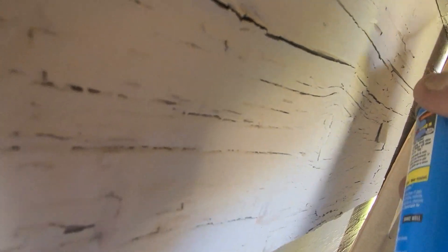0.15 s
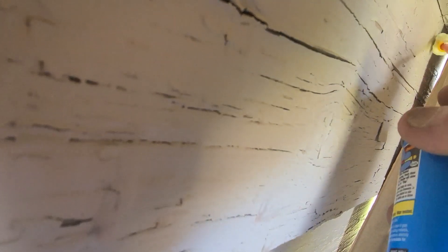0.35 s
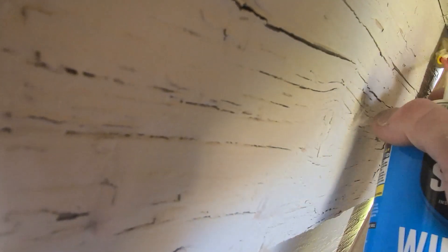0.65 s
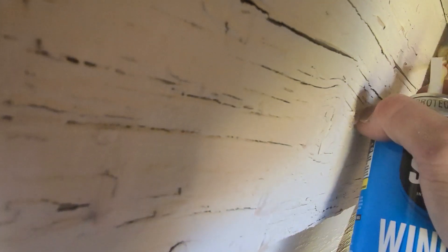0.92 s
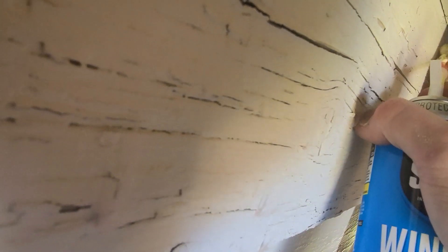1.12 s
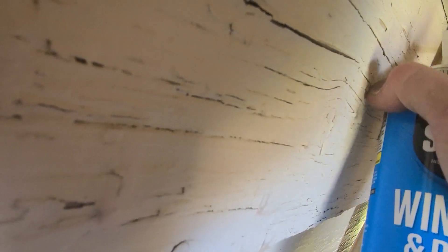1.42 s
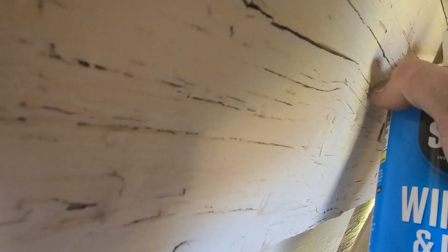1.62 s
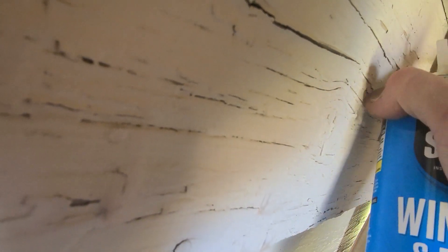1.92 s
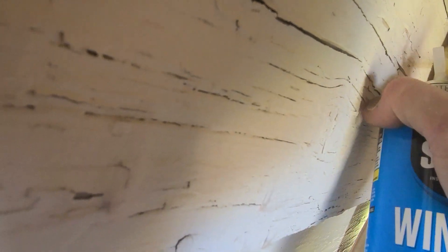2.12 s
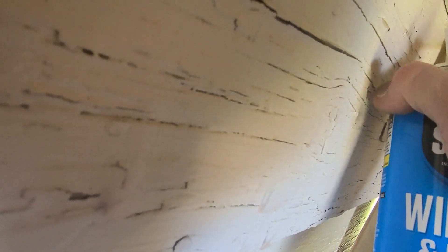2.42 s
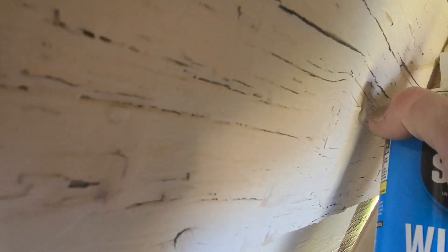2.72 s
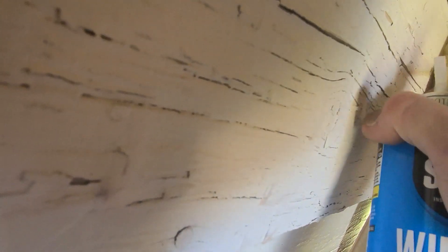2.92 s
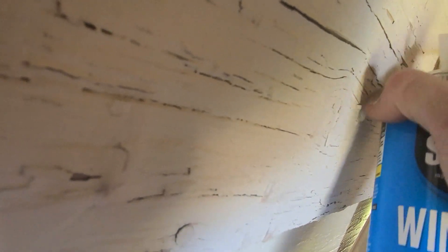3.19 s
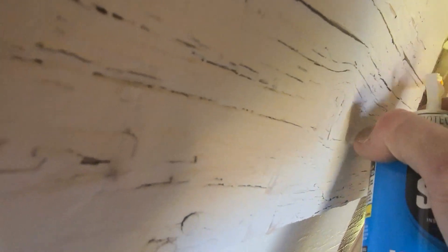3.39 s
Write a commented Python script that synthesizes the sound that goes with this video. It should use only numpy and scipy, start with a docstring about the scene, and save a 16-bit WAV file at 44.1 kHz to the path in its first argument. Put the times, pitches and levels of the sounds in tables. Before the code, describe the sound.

Aerosol foam sprays through a straw into a gap in boards: faint hand rubbing and small plastic clicks, then a bright spit becoming a rapid hollow sputter, close to a small stereo microphone, slightly right.

```python
"""Foam sealant is sprayed from an aerosol straw into a gap in a wooden wall, right of a small camera.
Throughout, filtered noise gives a low rumble; at first a hand shifts on the can, as noise of wavering level.
The trigger clicks three times, as decaying sines with a short rattle, scattered by the boards.
Gas and foam then spit in quick bursts: noise and bubble pops drive a bright hiss, the straw tip and the gap,
which rings like a bottle neck whose lowest pitch later sinks as foam fills it and buries the tip."""
import sys
import numpy as np
from scipy import signal
from scipy.fft import rfft, irfft
from scipy.io import wavfile
from scipy.ndimage import uniform_filter1d

SR = 44100
rng = np.random.default_rng(int(sys.argv[2]) if len(sys.argv) > 2 else 0)


def voltage_ratio(decibels):
    """Convert decibels (scalar or array-like) to amplitude ratios, 20 dB per decade."""
    exponent = np.asarray(decibels, float) / 20
    return 10 ** exponent


def transcribe(signal):
    """Save signal, clipped to [-1, 1], as a 16-bit WAV file at the path in sys.argv[1]."""
    frames = np.atleast_2d(signal).T
    limited = np.clip(frames, -1, 1)
    pcm = np.round(limited * 32767).astype(np.int16)
    wavfile.write(sys.argv[1], SR, pcm)


N = 156555  # samples

# Spectrum of the rumble. Each row: frequency in Hz, relative density in dB per Hz.
RUMBLE_SPECTRUM = [(12, -44), (35, 0.5), (47, -0.5), (57, 11), (78, -6.5), (118, -1.5), (140, -22),
                   (800, -46)]
# Strength of the hand and sleeve rubbing. Each row: time in seconds, mean level in dB.
RUB_LEVEL = [(0, -40), (0.128, -38.5), (.165, -30), (.29, -33), (.38, -39), (.5, -41.5), (.515, -44.5),
             (.64, -46)]
# Spectrum of the rubbing. Each row: frequency in Hz, relative density in dB per Hz.
RUB_SPECTRUM = [(300, -13.5), (750, -4), (1050, -6), (1450, 4), (2050, -0.5), (2600, -9), (3150, -8),
                (4600, -24.5), (6400, -13.5), (9000, -34), (12000, -23)]
# Trigger clicks. Each row: start in seconds, level before the high-pass in dB,
# treble tilt about 3 kHz in dB per octave.
TRIGGER_CLICKS = [(.3028, -11, 5), (.3113, 3, 1), (.3355, -2.5, -3)]
# Modes of the plastic trigger. Each row: frequency in Hz, level before the tilt in dB,
# time to decay by 60 dB in seconds.
TRIGGER_MODES = [(1250, -1, .008), (2000, -4, .006), (2750, -2, .007), (3650, 0, .006), (5000, -4, .005),
                 (6050, 2, .009), (6750, 0, .008)]
# Valve and gap. Each row: time in seconds, steady flow level in dB, hiss relative to the flow in dB,
# then third pitch, second pitch and straw tip, each relative to the lowest pitch in dB.
VALVE_FLOW = [(.622, -53, -10, -18, -23, -13), (.645, -29, 4, 1, -1, 14.5), (.715, -27, 9.5, -6, 11, 11),
              (.74, -32.5, 8, -12.5, 6, 3), (.98, -32.5, -8, -7, -4, 5.5), (1.3, -29.5, -15, -0.5, -3, -1),
              (1.42, -27.5, -9, -3.5, -1.5, 4), (1.7, -24, -19, -12, 3, -9.5),
              (2.21, -26.5, -18.5, -28, 1, -16), (2.35, -20, -22.5, -42, 12.5, -11),
              (2.73, -24, -24.5, -10, 14, -6.5), (2.757, -34, -19, -2.5, 12, -5), (2.8, -28, -7, -3, 4, -1),
              (2.93, -27, -9.5, 6.5, 10, -3), (3.07, -27, -13.5, -12.5, 9, -9.5),
              (3.17, -24, -25, -49, 15, -4.5), (3.3, -26, -13, -7, 11.5, -4),
              (3.55, -22, -11, 10.5, 21.5, 1.5)]
# Gas breaking into the open air with a bright crack. Each row: start in seconds, peak level in dB.
OPEN_AIR_CRACKS = [(0.69, -17), (.776, -26), (0.876, -22.5), (.748, -31), (1.17, -33), (1.389, -21.5),
                   (1.405, -28), (1.751, -34)]
# Bursts of gas through the foam. Each row: start in seconds, peak level in dB.
GAS_SPITS = [(0.772, -31), (0.806, -31), (0.83, -32.5), (0.872, -26.5), (0.921, -25.5), (0.953, -24.5),
             (0.996, -25.5), (1.021, -25), (1.047, -19.5), (1.083, -19.5), (1.135, -18.5), (1.165, -21),
             (1.231, -17.5), (1.286, -23), (1.316, -20), (1.342, -20.5), (1.392, -19.5), (1.454, -20),
             (1.479, -21.5), (1.512, -24.5), (1.533, -19.5), (1.588, -24.5), (1.61, -21), (1.667, -20.5),
             (1.7, -21), (1.72, -21), (1.749, -18), (1.805, -21), (1.828, -30), (1.865, -18), (1.905, -21),
             (1.939, -23.5), (1.961, -19.5), (1.991, -23.5), (2.023, -23), (2.042, -23.5), (2.086, -23),
             (2.121, -20.5), (2.164, -25), (2.223, -19), (2.268, -37), (2.284, -32), (2.322, -23),
             (2.358, -27), (2.399, -25), (2.44, -23), (2.488, -22.5), (2.519, -22), (2.564, -21.5),
             (2.609, -24), (2.636, -34), (2.653, -19), (2.699, -16), (2.737, -21), (2.767, -23.5),
             (2.938, -23), (3.004, -28), (3.106, -23), (3.163, -25), (3.19, -24.5), (3.251, -23.5),
             (3.291, -26.5), (3.398, -22), (3.469, -23), (3.508, -28)]
# Lowest pitch of the gap, about which it wanders. Each row: time in seconds, frequency in Hz.
GAP_PITCH = [(1.8, 763), (2.4, 615), (2.8, 528), (3.55, 404)]
# Second pitch of the gap, about which it wanders. Each row: time in seconds, frequency in Hz.
SECOND_PITCH = [(1.3, 1200), (2.3, 1371)]
# Straw tip resonances. Each row: frequency in Hz, width of each pole in Hz, relative gain in dB.
TIP_RESONANCES = [(3020, 700, 17.5), (4325, 2040, -8)]
# Spectrum of the open hiss. Each row: frequency in Hz, relative density in dB per Hz.
HISS_SPECTRUM = [(3000, -6), (5100, -3), (5900, 7), (7600, -6), (9800, -10), (12000, -2), (13500, -3),
                 (15500, 4)]
# Microphone pair, source on the right. Each row: frequency in Hz, left minus right level in dB,
# shared part of the power from 0 to 1, phase lag of the left in radians.
MICROPHONE_PAIR = [(0, 0, .98, 0), (260, -3, .88, .4), (430, -8, .75, .8), (600, 1, .87, .8),
                   (780, -2, .94, 1.75), (1130, 1, .97, 2.4), (1480, 1.5, .95, 3.1), (1980, 1, .86, 4.1),
                   (2250, -4, .45, 4), (2550, -2, .75, 3.1), (2900, 3.5, .82, 4.7), (3450, -7, .35, 4),
                   (4130, -4, .55, 5.3), (6300, 0, .72, 9.1), (8000, 6.5, .2, 12), (9500, 0, .25, 14),
                   (15000, 4, .3, 22)]


def evened(x):
    """Normalization: each signal is divided by its root mean square."""
    return x / np.sqrt(np.mean(x ** 2, -1, keepdims=True) + 1e-20)


def colour(x, points):
    """Linear filtering: the spectrum is weighted by (Hz, dB) points joined over log frequency."""
    point_hz, db = np.transpose(points)
    hz = np.fft.rfftfreq(N, 1 / SR)
    gain = voltage_ratio(np.interp(np.log(hz + 1), np.log(point_hz + 1), db))
    return irfft(rfft(x) * gain, N)


def drift(seconds):
    """Random fluctuation: noise averaged twice over the given time, with rms 1."""
    size = max(int(seconds * SR), 2)
    once = uniform_filter1d(rng.standard_normal(N), size)
    return evened(uniform_filter1d(once, size))


def rumble():
    """Partial coherence: low noise of wavering level, nearly the same in both microphones."""
    level_db, waver_db, apart = -40.5, 0.5, 0.13
    common, difference = rng.standard_normal((2, N))
    pair = np.array([common + apart * difference, common - apart * difference])
    return voltage_ratio(level_db + waver_db * drift(0.017)) * evened(colour(pair, RUMBLE_SPECTRUM))


def rub():
    """Dry friction: skin and cloth give coloured noise, one strand shared and one per microphone."""
    grain_db = 2.5  # rms of the level's wavering
    level_db = np.interp(np.arange(N) / SR, *np.transpose(RUB_LEVEL), right=-120)
    friction = evened(colour(rng.standard_normal((3, N)), RUB_SPECTRUM))
    return voltage_ratio(level_db + grain_db * drift(0.0047)) * friction


def trigger():
    """Modal excitation: each click rings the plastic trigger's damped modes and leaves a short rattle."""
    rattle_db, rattle_t60_s, low_cut_hz = -21, .14, 750
    out, t = np.zeros(N), np.arange(6000) / SR
    for start_s, level_db, tilt_db in TRIGGER_CLICKS:
        ring = np.zeros(len(t))
        for hz, mode_db, t60_s in TRIGGER_MODES:
            decay = voltage_ratio(mode_db + tilt_db * np.log2(hz / 3000) - 60 * t / t60_s)
            ring -= decay * np.sin(2 * np.pi * hz * t)
        chatter = rng.standard_normal(len(t)) * voltage_ratio(-60 * t / rattle_t60_s)
        rattle = np.convolve(chatter, ring[:400])[:len(t)]
        click = ring / abs(ring).max() + voltage_ratio(rattle_db) * rattle / abs(rattle).max()
        out[round(start_s * SR):][:len(t)] += voltage_ratio(level_db) * click
    return signal.lfilter(*signal.butter(2, low_cut_hz, "high", fs=SR), out)


def scattered(x):
    """Diffuse reflection: the boards add to the direct strand a brief noise tail per microphone."""
    wall_t60_s = .016
    t = np.arange(3000) / SR
    tail = rng.standard_normal((2, len(t))) * voltage_ratio(-60 * t / wall_t60_s)
    tail /= np.linalg.norm(tail, axis=1, keepdims=True)
    return np.vstack([x, signal.oaconvolve(x[None], tail, axes=1)[:, :N]])


def turbulence():
    """Jet noise: broadband noise and random bubble pops, one strand shared and one per microphone."""
    bubbles_per_s, bubble_db, bubble_share = 2500, 1.5, .4  # share of the power
    flutter_db = 1.2
    sizes = voltage_ratio(bubble_db * np.minimum(rng.exponential(1, N), 3))
    pops = sizes * (rng.random(N) < bubbles_per_s / SR)
    bubbles = evened(pops * rng.choice([-1, 1], (3, N)))
    noise = rng.standard_normal((3, N))
    strands = np.sqrt(1 - bubble_share) * noise + np.sqrt(bubble_share) * bubbles
    return strands * voltage_ratio(flutter_db * drift(0.0087))


def bursts(rows, fall_s):
    """Transient flow: the power of each puff rises quickly and falls to half in fall_s after its peak."""
    rise_s = .007  # from start to peak
    t, power = np.arange(N) / SR, np.zeros(N)
    for start_s, db in rows:
        near = slice(int((start_s - .05) * SR), int((start_s + .1) * SR))
        from_peak = t[near] - start_s - rise_s
        half_s = np.where(from_peak < 0, rise_s / 2, fall_s)
        power[near] += voltage_ratio(2 * db) * .5 ** ((from_peak / half_s) ** 2)
    return power


def resonate(x, hz, width_hz):
    """Resonance: a double pole, each of width_hz, follows the frequency hz."""
    turn = np.exp(2j * np.pi * np.cumsum(hz * np.ones(N)) / SR)
    r = np.exp(-np.pi * width_hz / SR)
    # shift the resonance to zero frequency, low-pass, and shift back
    lowered = signal.lfilter([(1 - r) ** 2], [1, -2 * r, r * r], x / turn + 1e-18)
    return (turn * lowered).real


def spray():
    """Driven resonance: bursts over a steady flow excite the gap's three pitches, the tip and the hiss."""
    spit_fall_s, crack_fall_s = .01, 0.0097
    steady_hiss_db = -3  # the steady flow hisses less than the bursts
    low_width_hz, second_width_hz, third_width_hz = 350, 440, 620
    third_ratio, pitch_wander = 1.587, .035  # wander: rms fraction of the frequency
    own_flutter_db = 2

    t = np.arange(N) / SR
    flow_s, *columns = np.transpose(VALVE_FLOW)
    flow_db, hiss_db, third_db, second_db, tip_db = (np.interp(t, flow_s, c) for c in columns)
    steady = voltage_ratio(2 * flow_db) * (t > flow_s[0])
    spits = bursts(GAS_SPITS, spit_fall_s)
    body_power = steady + spits
    hiss_power = (voltage_ratio(2 * steady_hiss_db) * steady + spits) * voltage_ratio(2 * hiss_db)
    hiss_power += bursts(OPEN_AIR_CRACKS, crack_fall_s)

    jet = turbulence()
    low_hz = np.interp(t, *np.transpose(GAP_PITCH)) * (1 + pitch_wander * drift(0.0087))
    second_hz = np.interp(t, *np.transpose(SECOND_PITCH))
    wandering_hz = second_hz * (1 + pitch_wander * drift(0.0093))
    low = evened(resonate(jet, low_hz, low_width_hz))
    second = voltage_ratio(second_db) * evened(resonate(jet, wandering_hz, second_width_hz))
    third = voltage_ratio(third_db) * evened(resonate(jet, third_ratio * second_hz, third_width_hz))
    tip = np.zeros((3, N))
    for k, (hz, width_hz, db) in enumerate(TIP_RESONANCES):
        tip += (-1) ** k * voltage_ratio(db) * resonate(jet, hz, width_hz)  # alternating polarity
    tip = voltage_ratio(tip_db) * evened(tip)

    low_flutter, second_flutter, upper_flutter, hiss_flutter = (
        voltage_ratio(own_flutter_db * drift(0.012)) for _ in range(4))
    body = low * low_flutter - second * second_flutter + (third - tip) * upper_flutter
    # the shares divide the flow's power among the resonances
    body /= np.sqrt(1 + voltage_ratio(2 * second_db) + voltage_ratio(2 * third_db) + voltage_ratio(2 * tip_db))
    hiss = hiss_flutter * evened(colour(jet, HISS_SPECTRUM))
    return np.sqrt(body_power) * body + np.sqrt(hiss_power) * hiss


def microphones(strands):
    """Interaural-like cues: the shared strand lags at the left, and each microphone adds its own strand."""
    point_hz, *columns = np.transpose(MICROPHONE_PAIR)
    hz = np.fft.rfftfreq(N, 1 / SR)
    tilt_db, same, lag = (np.interp(hz, point_hz, c) for c in columns)
    spectra = rfft(strands)
    shared = np.array([np.exp(-1j * lag), np.ones(len(hz))]) * spectra[0]
    mixed = np.sqrt(same) * shared + np.sqrt(1 - same) * spectra[1:]
    return irfft(voltage_ratio(np.outer([.5, -.5], tilt_db)) * mixed, N)


def scene():
    """Superposition: the pressures of all sources add at the two microphones."""
    return rumble() + microphones(rub() + scattered(trigger()) + spray())


def roll_off(x):
    """The treble ends steeply here."""
    return signal.sosfilt(signal.butter(12, 15750, fs=SR, output="sos"), x)


def record(dry):
    """Sound capture: the camera takes the two-microphone mix at the level it arrives."""
    return roll_off(dry)


dry = scene()
out = record(dry)
transcribe(out)
```